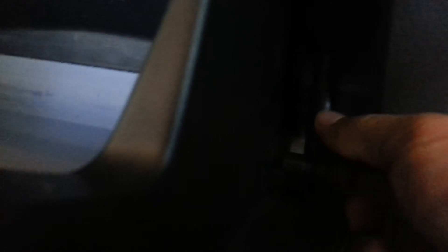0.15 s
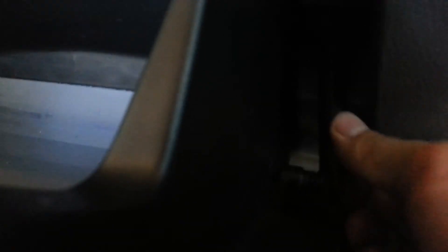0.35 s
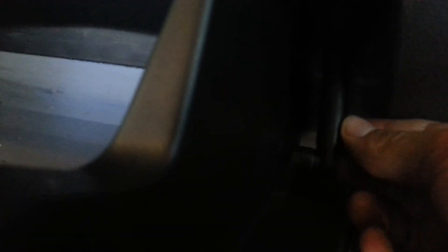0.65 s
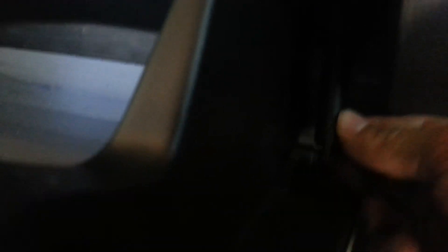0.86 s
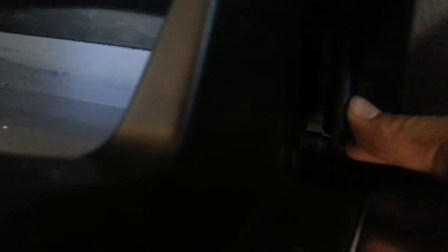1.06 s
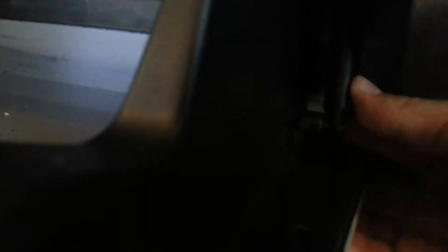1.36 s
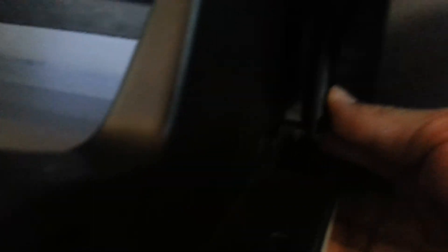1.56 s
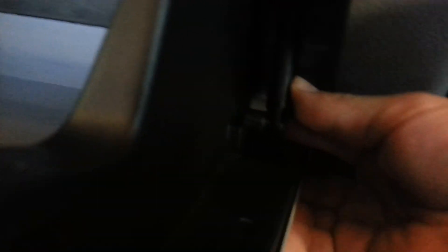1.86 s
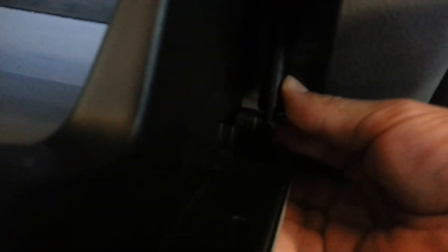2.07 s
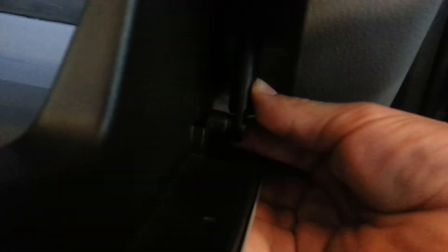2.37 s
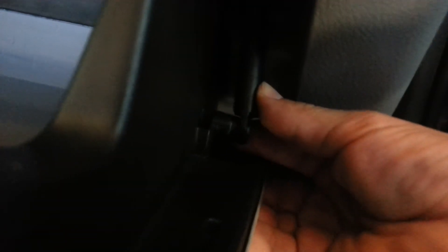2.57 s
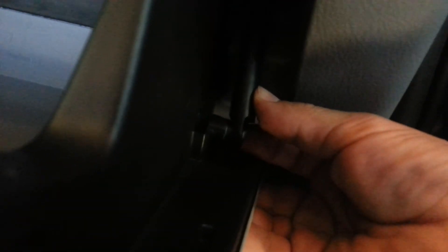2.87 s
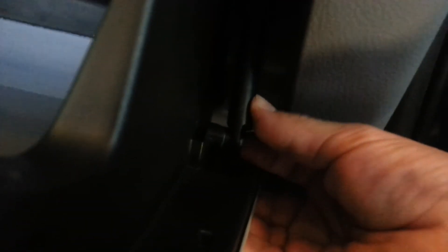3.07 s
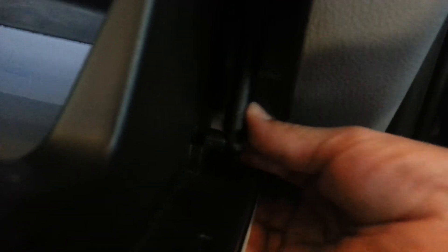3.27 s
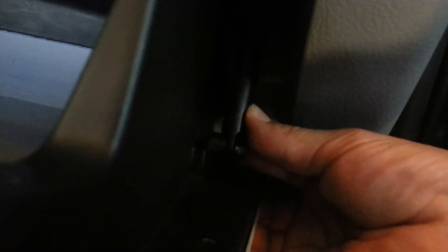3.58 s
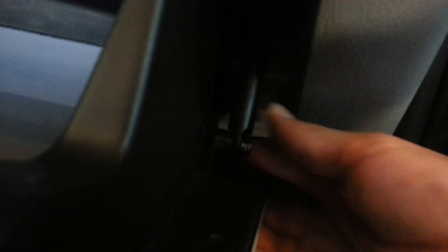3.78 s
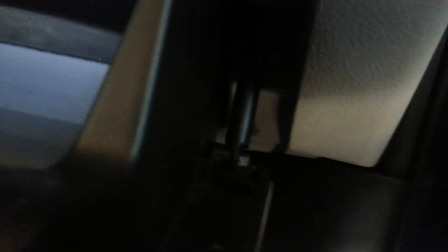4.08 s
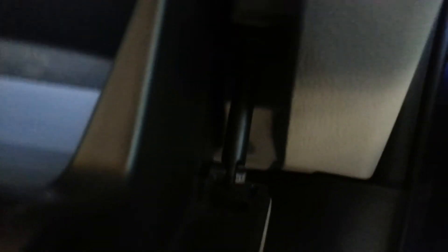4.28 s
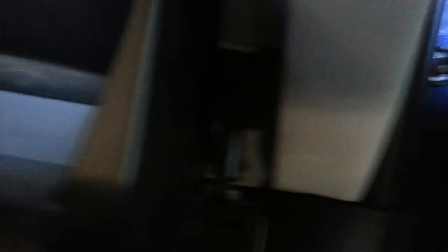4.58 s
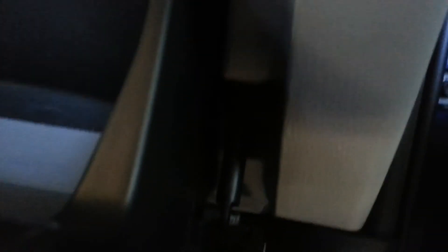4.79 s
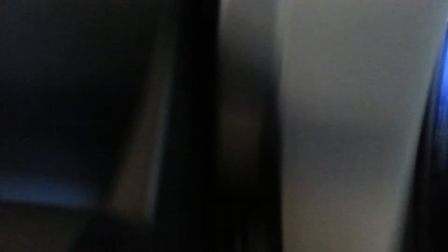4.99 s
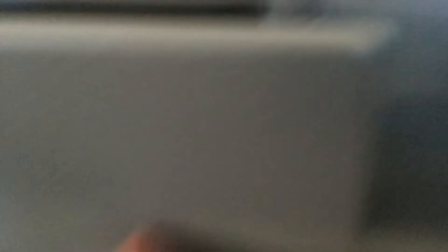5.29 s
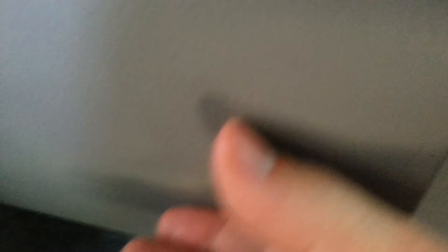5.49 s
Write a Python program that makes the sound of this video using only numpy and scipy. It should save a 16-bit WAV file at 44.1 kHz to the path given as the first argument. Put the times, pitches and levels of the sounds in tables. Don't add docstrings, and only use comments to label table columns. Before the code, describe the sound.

A close stereo microphone in a parked car hears quiet outdoor air: low traffic hum, far engines swelling, a thin high cricket throb and very faint bird whistles near 1.8, 3.8 and 5 s. At 0 s there is a soft hollow plastic rattle and rub, then around 0.45-0.55 s a short dry fingertip scrape with tiny jolts. Sparse, faint ticks follow until a hard, bright, clean snap at 2.76 s, with a short hollow plastic ring and quick rebounds. Light rattles return at 3.2-3.5 s, and a duller bump lands at 3.97 s. Rubbing grows from 4.2 s, then a huge crack and hollow knock at 4.43 s, with a second hit at 4.45 s, overloads the microphone, chattering away within about 40 ms and shuddering the cabin briefly. Soft rubs and small rattles trail from 4.55 to 5 s, leaving the quiet background until 5.6 s.

```python
import sys
import numpy as np
from scipy import signal
from scipy.io import wavfile
from scipy.ndimage import uniform_filter1d

SR = 44100
rng = np.random.default_rng(int(sys.argv[2]) if len(sys.argv) > 2 else 0)


def master(y):
    cut = np.clip(np.atleast_2d(y).T, -1, 1)
    pcm = np.round(cut * 32767)
    wavfile.write(sys.argv[1], SR, pcm.astype(np.int16))


def invert_db(x):
    u = np.asarray(x, float) / 20
    return 10 ** u


N = 248724

# frequency in Hz, level in dB per Hz.
RUMBLE = [(25, -23), (45, -10), (65, 0), (90, 1.5), (130, -9)]
HUM = [(47, -31), (80, -16), (115, -3), (140, -8.5), (168, -5.5), (246, -3), (376, -12), (437, -9),
       (541, -12), (658, -11.5), (1020, -19.5), (1340, -20), (3000, -32), (3900, -66), (6600, -120)]
HISS = [(300, 4.5), (1000, 8), (2500, 4.5), (4200, 2), (5400, 6.5), (7400, -1), (11000, -0.5), (14400, 3),
        (16000, -8.5)]
# frequency in Hz, likeness from -1 to 1.
LIKENESS = [(60, 0.68), (180, 0.92), (530, 0.015), (1580, 0.12), (4700, -0.29), (14000, 0.13)]
# time in seconds, level in dB.
STIR = [(0, 2), (.3, 1.5), (.7, -0.3), (2.7, -1), (3.3, 0.4), (3.9, 1.2), (4.2, 2.5), (4.5, 5.5), (4.75, 5),
        (5.1, 0.3), (5.64, -0.4)]
# start in seconds, length in seconds, pitch in Hz, level in dB.
DRONES = [
    (.95, 0.48, 250, -69),
    (1.65, 0.17, 110, -70),
    (2.1, 0.53, 116, -64),
    (3.15, 0.85, 68, -61),
    (3.6, 0.42, 160, -62),
    (4.7, 1.3, 80, -62),
]
# wing tone in Hz, level in dB, pulses per second.
CRICKETS = [(5540, -1.5, 29.2), (5330, -6.5, 14), (5880, -12, 36)]
# frequency in Hz, width in Hz, level in dB.
CHORUS = (5350, 560, -1)
# start in seconds, length in seconds, start pitch in Hz, end pitch in Hz, level in dB.
BIRDS = [
    (1.823, 0.047, 6000, 7000, -74),
    (1.86, .03, 6400, 6960, -78),
    (3.787, 0.033, 1413, 1400, -74),
    (3.815, 0.05, 1400, 1380, -74),
    (4.885, 0.1, 1456, 1350, -73),
    (5.147, .04, 1380, 1340, -74.5),
    (5.472, 0.11, 1310, 1425, -76),
    (5.576, .05, 1440, 1387, -78),
]

# peak in seconds, level in dB,
# rise in seconds per 20 dB, fall in seconds per 20 dB, hollow box over panel in dB.
RUBS = [(.002, -52, .01, .05, 12), (.1, -67, .1, .1, 11), (2.745, -52, .03, .014, 6),
        (3.265, -59, .04, .07, 9), (3.33, -65, .04, .05, 9), (3.7, -66, .3, .2, 8),
        (3.89, -72, .05, .08, 18), (3.962, -53, .03, .005, -10), (4.23, -47, .1, .1, -4),
        (4.275, -43, .07, .045, -2), (4.36, -55, .2, .12, 8), (4.424, -55, .03, .005, 19),
        (4.441, -17, .008, .03, -9), (4.4515, -13, .006, .012, -9), (4.52, -50, .06, .035, -12),
        (4.55, -44, .012, .03, -12), (4.585, -50, .02, .04, -10), (4.62, -55, .015, .04, -8),
        (4.259, -45, .006, .015, -4), (4.85, -62, .03, .12, 11), (4.95, -69, .1, .2, 11),
        (5.3, -71, .4, .3, -3)]
SCRAPE = [(.452, -63, .06, .03, -3), (.478, -58, .02, .03, -5), (.463, -57, .01, .06, -8),
          (.492, -45.5, .006, .05, -4), (.511, -43.5, .006, .05, -7), (.528, -48, .04, .035, -5),
          (.54, -47, .015, .02, -6)]
# frequency in Hz, width in Hz, level in dB.
RUB_COLOUR = [(650, 55, -7), (1100, 680, -5), (1600, 220, 3), (2370, 540, -6.5), (3300, 1200, -7.5),
              (5000, 1100, -13.5), (8500, 3500, -25)]
SCRAPE_COLOUR = [(677, 120, -0.5), (1250, 270, 2.5), (2130, 540, -2), (3500, 1200, -10.5),
                 (5270, 2500, -15), (10500, 5500, -30)]
RUB_BODY = [(193, 45, -0.5), (262, 110, -1.5), (360, 70, -3.5), (453, 68, -7.5), (635, 140, -8)]
# peak in seconds, level in dB, rise and fall in seconds per 20 dB,
# frequency in Hz, width in Hz.
SKIN = (.538, -55, .05, .025, 8000, 7000)

# start in seconds, crack in dB, hollow body in dB, ring of the struck spot in Hz, left over right in dB.
RATTLES = [(0.0024, -39, -29.5, 970, -6), (0.0429, -44, -28.5, 910, -6.5), (0.4614, -33.5, -37.5, 1200, -6),
           (2.2594, -50, -57, 977, -9), (3.2349, -32, -40, 1250, -4), (3.3148, -40.5, -41.5, 2600, -11),
           (3.4059, -42, -31, 1400, -3.5), (3.468, -33, -21, 560, -4.5), (3.7194, -54, -42, 1387, -5),
           (4.6893, -29, -25.5, 1700, -4), (4.7078, -30.5, -22.5, 3210, -1.5),
           (4.8244, -35, -26.5, 2300, -0.5), (4.847, -38, -36, 1540, -2), (4.8725, -35, -29.5, 1530, -0.5),
           (4.969, -33, -28.5, 3042, -2.5)]
TICKS = [(.271, -47.5, -69, 3300, -13), (1.51, -53, -47, 2500, -4), (2.567, -45, -45, 4300, -3),
         (2.884, -42, -29, 603, -6), (2.925, -40, -44, 3100, 0.5), (3.324, -46, -66, 4600, -7),
         (2.9255, -44, -60, 4300, 0.5), (3.9685, -36, -60, 3950, -4), (4.644, -45, -60, 5000, -12),
         (4.7558, -40, -62, 4260, -6)]
JOLTS = [(.4915, -40, -50, 1150, -1), (.5103, -33, -46, 900, -1.5), (.5392, -32, -46, 1250, .4),
         (4.2485, -48, -30, 1500, -2), (4.2545, -46, -23, 620, -5), (4.2635, -36, -31, 1600, -4),
         (4.2925, -44, -22, 1500, -4), (4.396, -44, -36, 1500, 1.2), (4.5335, -44, -24, 1000, -2.2),
         (4.8295, -37, -36, 3600, -1.2), (3.2352, -35, -44, 3000, -4)]
BUMP = [
    (3.9676, -12.5, -8, 1154, -4.5),
    (3.9705, -19.5, -26, 1554, -4),
    (3.977, -36, -17, 650, -6),
    (3.997, -42, -25, 1450, -4),
    (4.208, -46, -36, 1500, -5),
    (4.412, -46, -30, 3300, -2.5),
]
SNAP = [
    (2.7641, .3, -4.5, 1380, -2),
    (2.7646, 1.5, -12, 2750, -1.5),
    (2.7683, -13, -11, 2650, -2.5),
    (2.772, -21, -13, 2200, 0),
    (2.793, -35, -33.5, 605, -2.5),
]
KNOCK = [
    (4.4295, 12, 14, 2500, -.5),
    (4.4376, -3, 6, 3500, -3),
    (4.4531, 7, 12, 2729, -2.5),
    (4.53, -39.5, -20, 2007, 0),
]

# frequency in Hz, level in dB, time to fall 60 dB in seconds.
DASH = [(160, -13, 0.116), (205, -8, 0.061), (266, -1.5, 0.093), (362, 1, 0.078), (422, -0.5, 0.063),
        (580, 0, 0.045), (647, -1, 0.057)]
GUIDE = [(202, 0.5, .07), (262, -3, .06), (370, -7, .05), (627, -2, .035)]
LID = [(155, 6, .2), (202, -2.5, .1), (255, -1, 0.093), (410, 0, 0.07), (545.6, -1, 0.05),
       (666, 7.5, 0.046)]
ARM_LOW = [(165, -11, 0.15), (216, -6, 0.05), (250, -12, .13), (351, 0, .085), (431, -7, 0.08),
           (501, -8, 0.07), (581, -4, .06), (644, 3, .055), (877, -8, .045)]
ARM_HIGH = [(991, -9, 0.05), (1097, -8, 0.035), (1420, -7, 0.028), (1740, -18, 0.02), (2245, -7, 0.025),
            (2820, -7, 0.045), (3560, -42.5, 0.18), (3670, -20, 0.023), (3960, -21, 0.035),
            (4440, -8, 0.014)]
BOX = [(62, -21, 0.3), (116, -14, 0.15), (156, -10, 0.25), (194, -18, 0.12), (247, -0.5, .11),
       (338, 0.8, .09), (373, 2, 0.1), (493, -7, 0.07), (595, -2, .06), (637, -1.5, 0.055), (752, -8, .045),
       (860, -12, .045), (995, -6, .05)]
PANEL = [(1004, 1, 0.017), (1210, -0.5, 0.052), (1500, 0.5, 0.035), (1900, -1, .018), (2460, -2, 0.015),
         (2800, -3, .015), (3300, -6, 0.013), (3870, -17, 0.011), (4500, -8, 0.0074)]
# frequency in Hz, level in dB per Hz.
CRACK = [(800, 1.5), (1500, 3), (2600, 3), (4200, -6), (5500, -6), (12000, -18)]
# frequency in Hz, time to fall 60 dB in seconds.
CRACK_T60 = [(800, .055), (1500, .037), (3000, 0.022), (6000, 0.034), (12000, 0.016)]
# time in seconds, level in dB.
GRIP = [(4.4, 0), (4.446, 0), (4.4515, -6), (4.453, 0), (4.5, 0), (4.511, -6), (4.53, -2), (4.62, 0)]
# frequency in Hz, time to fall 60 dB in seconds, level in dB per Hz.
CABIN = [(150, 0.34, 6), (300, 0.36, 3.5), (705, 0.33, -9), (1500, 0.26, -15), (3000, 0.46, -17.5),
         (4300, .4, -19), (6000, 0.27, -25), (9000, .2, -42), (14000, .2, -54)]

RUMBLE_DB, HUM_DB, HISS_DB, CRICKET_DB = -68, -61.5, -69.5, -67
HUM_FOLLOWS, CRICKETS_FOLLOW = 1.4, .3
FILL_CYCLES = 1.2
CHATTER_START_S, CHATTER_GAP_S, CHATTER_PAN_DB = 4.4617, .0081, -3
CHATTER_CRACK_DB, CRACK_LOSS_DB, CHATTER_BODY_DB, BODY_LOSS_DB = -7, 8, 8, 5
CHATTER_HZ, CHATTER_SAG = 3400, .86


def rms_one(x):
    return x / np.sqrt(np.mean(x ** 2) + 1e-30)


def peak_one(x):
    return x / np.abs(x).max()


def in_time(rows):
    s, value = np.transpose(rows)
    return np.interp(np.arange(N) / SR, s, value)


def at_hz(points, hz):
    table = np.array(points)
    return np.interp(np.log(hz), np.log(table[:, 0]), table[:, 1])


def drift(rate):
    r = np.exp(-80 * np.pi * rate / SR)
    noise = rng.standard_normal(N // 40 + 2002)
    slow = rms_one(signal.lfilter([1], [1, -2 * r, r * r], noise)[2000:])
    return np.interp(np.arange(N) / 40, np.arange(len(slow)), slow)


def ring(x, hz, t60):
    r, w = invert_db(-60 / (t60 * SR)), 2 * np.pi * hz / SR
    return signal.lfilter([0, np.sin(w)], [1, -2 * r * np.cos(w), r * r], x + 1e-18)


def resonance(x, hz, width_hz):
    r = np.exp(-np.pi * width_hz / SR)
    poles = [1, -2 * r * np.cos(2 * np.pi * hz / SR), r * r]
    return signal.lfilter([(1 - r * r) / 2, 0, (r * r - 1) / 2], poles, x)


def high_pass(x, order, hz):
    return signal.sosfilt(signal.butter(order, hz, "high", fs=SR, output="sos"), x)


def bands(low_hz, count, size):
    white = rng.standard_normal((2, 2, size))
    for k in range(count):
        low = low_hz * 2 ** (k / 2)
        high = min(low * np.sqrt(2), .45 * SR)
        band = signal.butter(2, [low, high], "band", fs=SR, output="sos")
        yield np.sqrt(low * high), signal.sosfilt(band, white[k % 2])


def coloured(spectrum, low_hz, count, patchy_db):
    out, together = 0, drift(1.8)
    for hz, (mid, side) in bands(low_hz, count, N):
        alike = np.clip(at_hz(LIKENESS, hz), -1, 1)
        gain = invert_db(at_hz(spectrum, hz) + patchy_db * (.5 * together + drift(8.3)))
        out = out + gain * (np.sqrt(1 + alike) * mid + np.sqrt(1 - alike) * side * [[1], [-1]])
    return rms_one(out)


def drones():
    out, waver, flutter = np.zeros(N), 1 + .027 * drift(4.7), invert_db(3 * drift(5.4))
    for s, length, hz, db in DRONES:
        at, size = round(s * SR), round(length * SR)
        span = slice(at, min(at + size, N))
        swell = np.hanning(size)[:span.stop - at] ** .5
        phase = 2 * np.pi * np.cumsum(hz * waver[span]) / SR
        out[span] += invert_db(db - .5) * swell * np.sin(phase)
    return out * flutter


def crickets():
    hz, width_hz, db = CHORUS
    far = resonance(rng.standard_normal((2, N)), hz, width_hz)
    out = invert_db(db) * rms_one(resonance(far, hz, width_hz))
    for hz, db, rate in CRICKETS:
        turns = np.cumsum(rate * (1 + .03 * drift(1.4))) / SR + rng.random()
        pulses = np.clip(.35 + np.sin(2 * np.pi * turns), 0, 1) * invert_db(1.3 * drift(6.5))
        wing = 2 * np.pi * np.cumsum(hz + 35 * drift(30)) / SR
        out = out + invert_db(db) * 2 * pulses * np.sin(wing + [[0], [1.6]])
    return rms_one(out)


def birds():
    out, flutter = np.zeros(N), invert_db(2.6 * drift(40))
    for s, length, start_hz, end_hz, db in BIRDS:
        at, size = round(s * SR), round(length * SR)
        phase = 2 * np.pi * np.cumsum(np.linspace(start_hz, end_hz, size)) / SR
        out[at:at + size] += invert_db(db + 9) * np.hanning(size) ** .5 * np.sin(phase)
    return out * flutter


def outdoors():
    stir_db = in_time(STIR)
    out = invert_db(RUMBLE_DB) * coloured(RUMBLE, 22, count=5, patchy_db=.8)
    out += invert_db(HUM_DB + HUM_FOLLOWS * stir_db) * coloured(HUM, 60.9, count=12, patchy_db=-.38)
    out += invert_db(HISS_DB + 7 + stir_db) * coloured(HISS, 300, count=12, patchy_db=-1.1)
    out += invert_db(CRICKET_DB + CRICKETS_FOLLOW * stir_db) * crickets()
    return out + birds() + drones()


def stroke(s, db, rise_s, fall_s):
    t = np.arange(N) / SR - s
    return invert_db(np.maximum(db - 20 * np.where(t < 0, -t / rise_s, t / fall_s), -140))


def rubbing(strokes, colour, per_s, size_db):
    sizes = invert_db(size_db * np.minimum(rng.exponential(1, N), 4))
    grains = rng.standard_normal((2, N)) * sizes * (rng.random(N) < per_s / SR)
    panel = rms_one(sum(invert_db(db) * (-1) ** k * resonance(grains, hz, w) for k, (hz, w, db) in enumerate(colour)))
    shared = grains[0] + .12 * grains[1] * [[1], [-1]]
    hollow = rms_one(sum(invert_db(db) * resonance(resonance(shared, hz, w), hz, w) for hz, w, db in RUB_BODY))
    pressure = np.array([stroke(*row[:4]) for row in strokes])
    hollow_gain = invert_db(np.array(strokes)[:, 4] - 2)
    return pressure.sum(axis=0) * panel + hollow_gain @ pressure * hollow


def skin():
    hiss = resonance(rng.standard_normal((2, N)), *SKIN[4:])
    return stroke(*SKIN[:4]) * rms_one(resonance(hiss, *SKIN[4:]))


def crack_scatter(bright_db, linger, size):
    t, out = np.arange(size) / SR, 0
    for hz, noise in bands(700, count=10, size=size):
        level_db = at_hz(CRACK, hz) + bright_db * np.log2(hz / 3000)
        out = out + invert_db(level_db - 60 * t / (linger * at_hz(CRACK_T60, hz))) * noise
    return out


def stiff_ringing(contact, modes, strength, chance):
    out = 0
    for k, (hz, db, t60) in enumerate(modes):
        sides = strength[:, k] * [1 if chance[k] > 0 else -1, 1]
        if k == len(modes) - 1:
            sides = [1, 1]
        out = out + invert_db(db) * np.outer(sides, ring(contact, hz, t60))
    return out


def hollow_body(modes, push_ms, lags_s, uneven, strength, size):
    t, out = np.arange(size) / SR, 0
    for k, (hz, db, t60) in enumerate(modes):
        push = np.sin(np.pi * np.clip((t[:400] - lags_s[k]) * 1000 / push_ms, 0, 1)) ** 2
        left = strength[0, k]
        sides = left * (strength[:, k:k + 1] / left) ** uneven
        ringing = ring(np.pad(push, ((0, 0), (0, size - 400))), hz, t60)
        out = out + invert_db(db) * sides * ringing * (1 - np.exp(-t * hz / FILL_CYCLES))
    return peak_one(out)


def blows(rows, low_modes, high_modes, ring_db, scatter_db, top_hz, push_ms, swell_ms, contact_ms,
          later_ms=None, grit=1.1, bright_db=.1, cycles=26.0, linger=1.01, lag_ms=.58, uneven=.01,
          spread_db=2.2, size=12000):
    out, t = np.zeros((2, N + size)), np.arange(size) / SR
    scatter = crack_scatter(bright_db, linger, size)
    soft = signal.butter(4, top_hz, fs=SR, output="sos")
    swell = 1 - .66 * np.exp(-t * 1000 / swell_ms)
    for n, (s, crack_db, body_db, hz, pan_db) in enumerate(rows):
        ms = contact_ms if n < 2 or later_ms is None else later_ms
        chance = rng.standard_normal((4, size))
        clicks = (grit if n < 2 else 1) * chance[0] * np.abs(chance[1]) - 5 * (t == 0)
        contact = signal.sosfilt(soft, clicks * np.exp(-(t * 1500 / ms) ** 2))
        strength = invert_db(spread_db * chance[2, :60].reshape(2, 30))
        stiff = stiff_ringing(contact, high_modes + [(hz, ring_db, cycles / hz)], strength, chance[3])
        hiss = signal.fftconvolve(scatter, contact[None, :600], axes=1)[:, :size]
        crack = peak_one(peak_one(stiff) + invert_db(scatter_db) * peak_one(hiss))
        lags_s = lag_ms / 1000 * np.abs(chance[3, 30:70]).reshape(20, 2, 1)
        body = hollow_body(low_modes, push_ms, lags_s, uneven, strength[:, 15:], size)
        at = max(round(s * SR), 0)
        pan = invert_db([[pan_db / 2], [-pan_db / 2]])
        out[:, at:at + size] += pan * (invert_db(crack_db) * crack + invert_db(body_db - 5) * body * swell)
    return out[:, :N]


def guide_jolts():
    return blows(JOLTS, GUIDE, PANEL[:7], ring_db=8, scatter_db=-5, top_hz=4500, push_ms=1.1, swell_ms=3.1,
                 contact_ms=.6, grit=.8, size=5000)


def small_contacts():
    out = blows(RATTLES, DASH, PANEL[:7], ring_db=12, scatter_db=-6, top_hz=2900, push_ms=1.23, swell_ms=2.9,
                contact_ms=1.3, size=8000)
    out += blows(TICKS, DASH, ARM_HIGH[5::2], ring_db=9.5, scatter_db=-4.5, top_hz=9000, push_ms=1.2, swell_ms=5,
                 contact_ms=.7, size=8000)
    out += blows(BUMP, LID, PANEL[:8], ring_db=2.5, scatter_db=2, top_hz=4000, push_ms=.84, swell_ms=3.4,
                 contact_ms=.35, grit=.3, bright_db=-1.5, later_ms=5, spread_db=1.2)
    return out


def arm_snap():
    return blows(SNAP, ARM_LOW, ARM_HIGH, ring_db=10, scatter_db=-1.5, bright_db=-2.2, top_hz=12000, push_ms=1.2,
                 swell_ms=2.3, contact_ms=.4, grit=.25, later_ms=1.6, cycles=17.0, linger=.9, lag_ms=.6,
                 uneven=.6, spread_db=1.5)


def chatter():
    return [(CHATTER_START_S + k * CHATTER_GAP_S, CHATTER_CRACK_DB - k * CRACK_LOSS_DB,
             CHATTER_BODY_DB - k * BODY_LOSS_DB, CHATTER_HZ * CHATTER_SAG ** k, CHATTER_PAN_DB) for k in range(4)]


def box_knock():
    rows = KNOCK[:3] + chatter() + KNOCK[3:]
    stiff_modes = PANEL + [(4300, -1.5, .012), (5000, -1.5, .012)]
    hits = blows(rows, BOX, stiff_modes, ring_db=-2.5, scatter_db=5.5, top_hz=17000, push_ms=.81, swell_ms=2.2,
                 contact_ms=2.7, bright_db=.8, lag_ms=.62, uneven=2.4, spread_db=1.2)
    return hits * invert_db(in_time(GRIP))


def cabin(x, size=16000):
    t, table = np.arange(size) / SR, np.array(CABIN)
    tail = 0
    for hz, noise in bands(110, count=15, size=size):
        tail = tail + invert_db(at_hz(table[:, ::2], hz) - 60 * t / at_hz(table, hz)) * noise
    tail = tail * np.clip(t / .024, 0, 1)
    force = uniform_filter1d(np.abs(x), size=90) * rng.standard_normal((2, N))
    return signal.fftconvolve(force, tail / np.sqrt(np.sum(tail ** 2)), axes=1)[:, :N]


def scene():
    around = outdoors()
    small, snap, knock = small_contacts(), arm_snap(), box_knock()
    near = high_pass(small + snap, 4, 125) + high_pass(knock, 2, 45)
    friction = rubbing(RUBS, RUB_COLOUR, per_s=6000, size_db=.5)
    friction += rubbing(SCRAPE, SCRAPE_COLOUR, per_s=9000, size_db=1.2) + skin()
    jolts = guide_jolts()
    shudder = cabin(invert_db(-20) * knock + invert_db(-22) * snap + invert_db(-14.5) * small)
    return around + friction + jolts + near + shudder


def roll_off(x):
    return signal.sosfilt(signal.butter(12, 14600, fs=SR, output="sos"), x)


def record(dry):
    heard = high_pass(dry, 2, 28)
    overloaded = heard / (1 + np.abs(heard) ** 12) ** (1 / 12)
    return roll_off(overloaded)


dry = scene()
out = record(dry)
master(out)
```